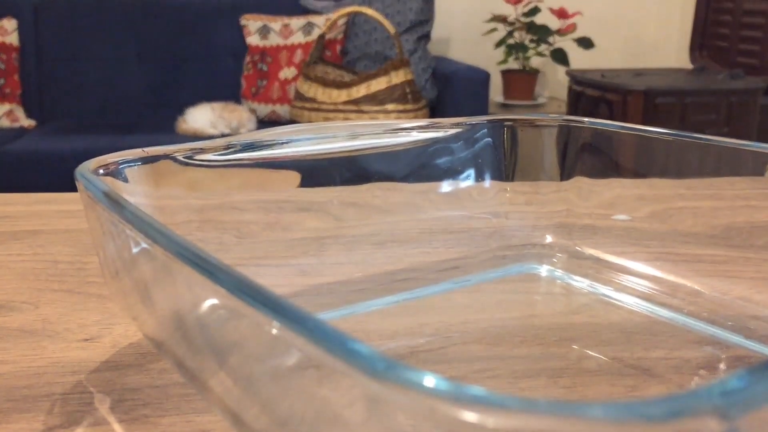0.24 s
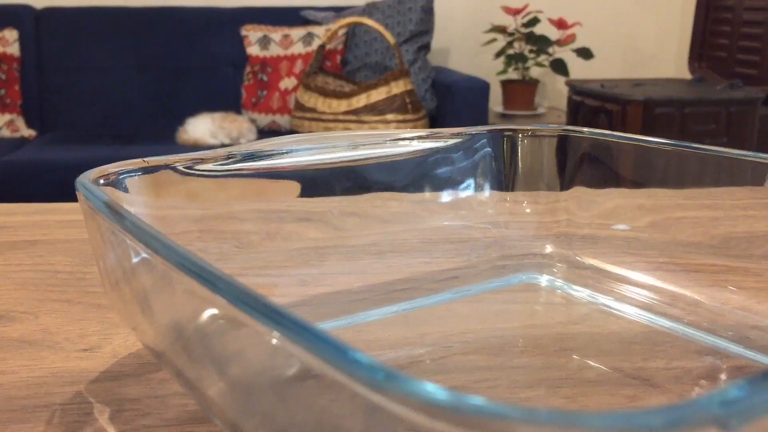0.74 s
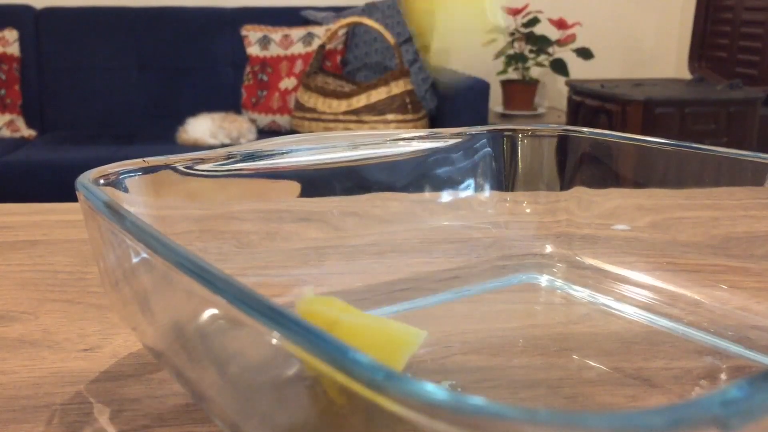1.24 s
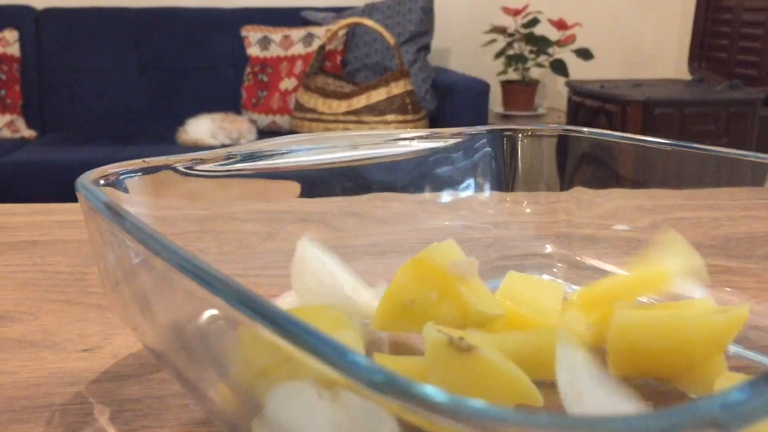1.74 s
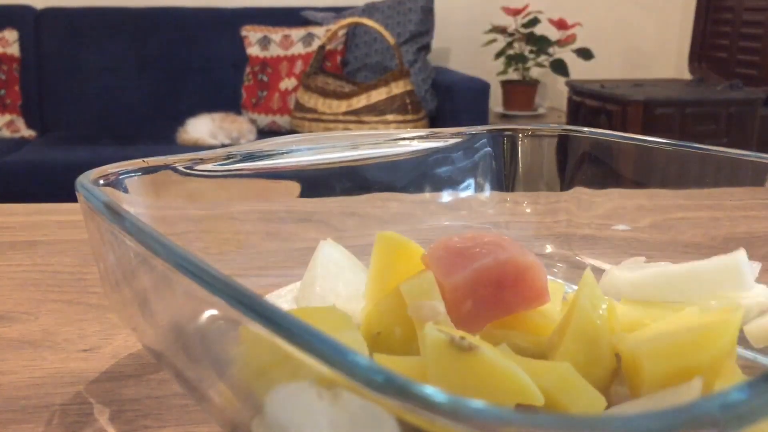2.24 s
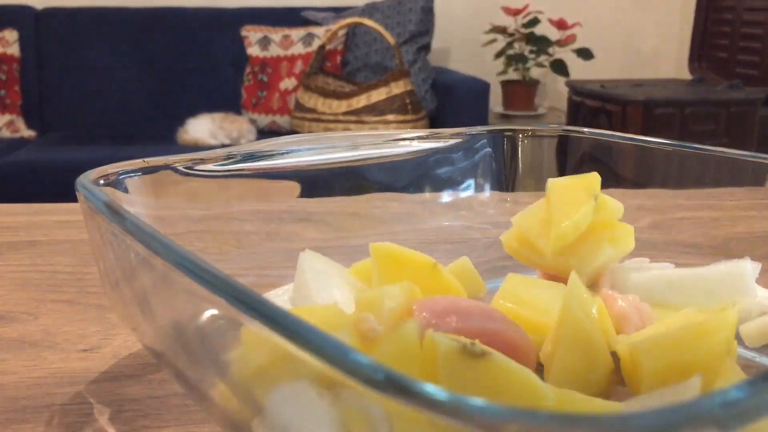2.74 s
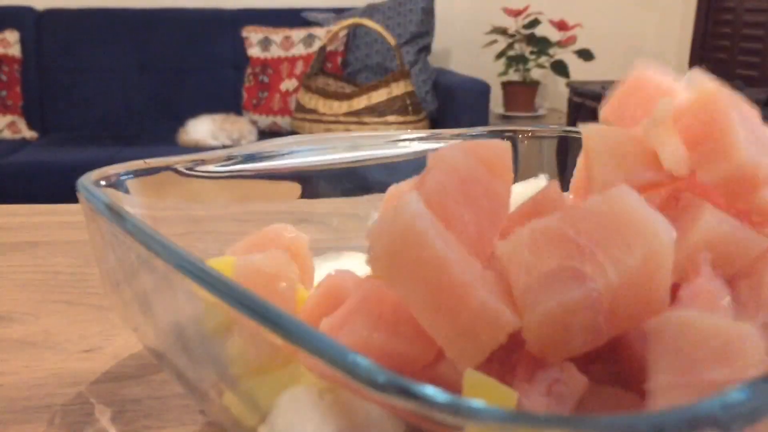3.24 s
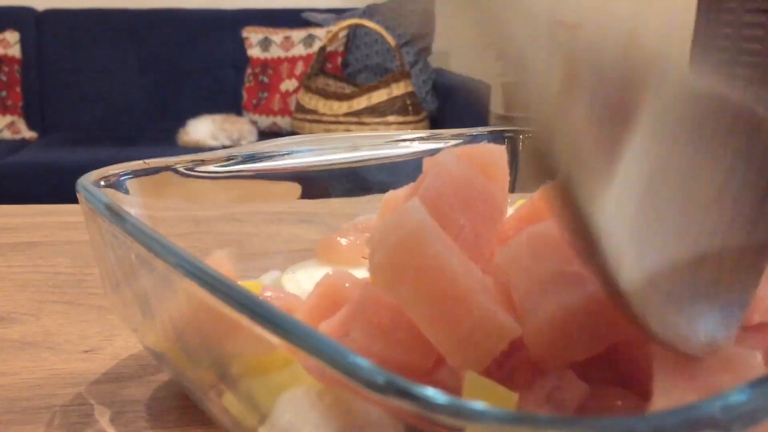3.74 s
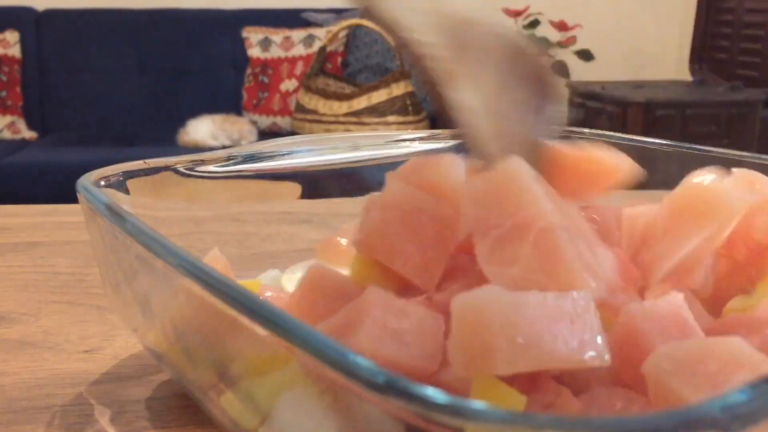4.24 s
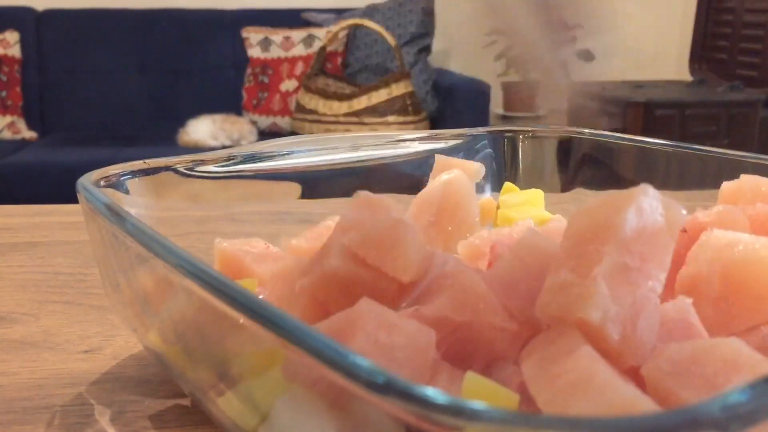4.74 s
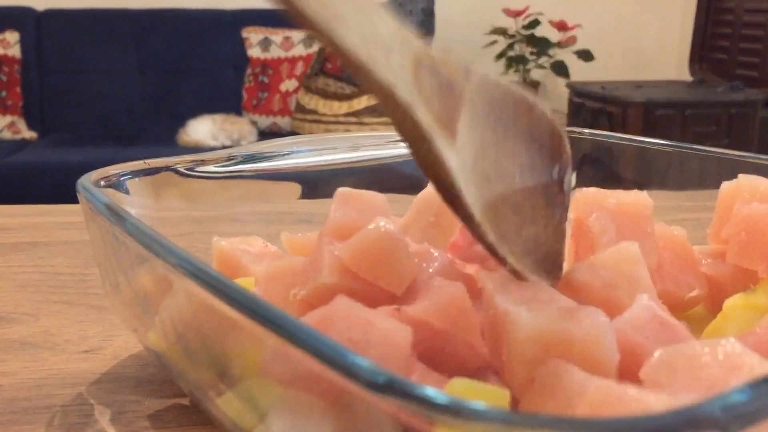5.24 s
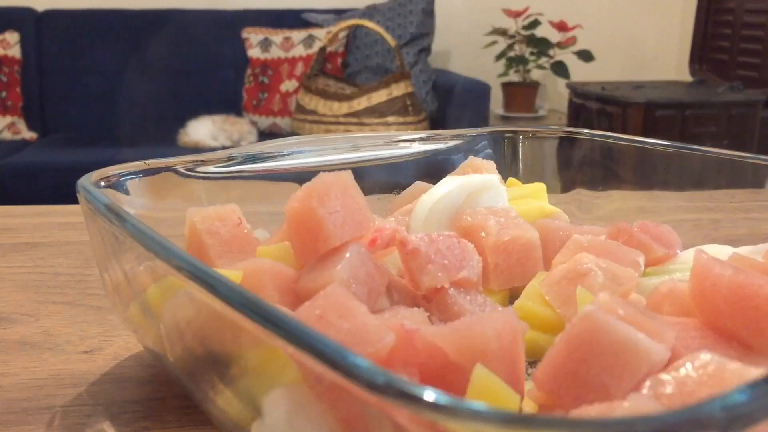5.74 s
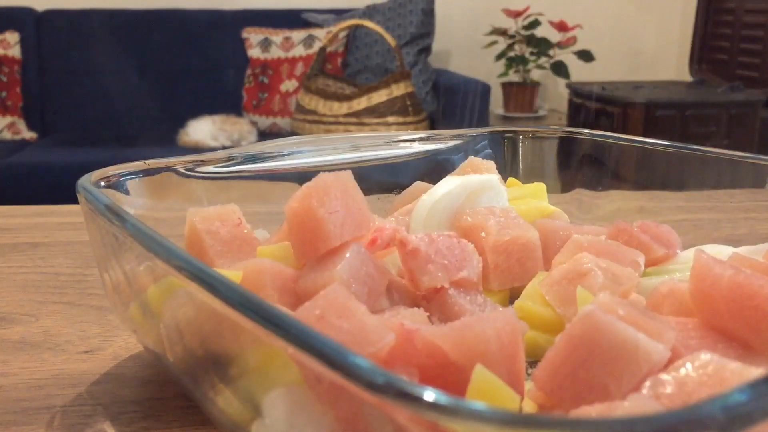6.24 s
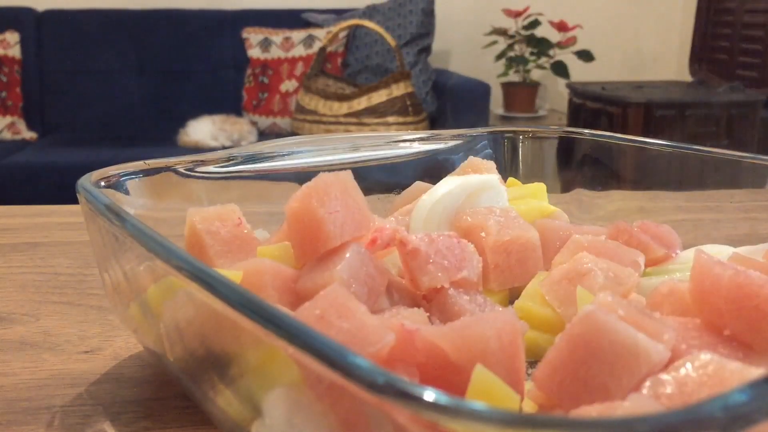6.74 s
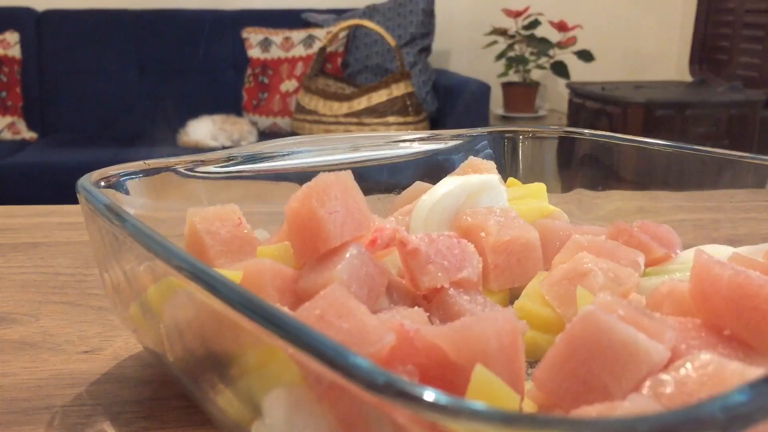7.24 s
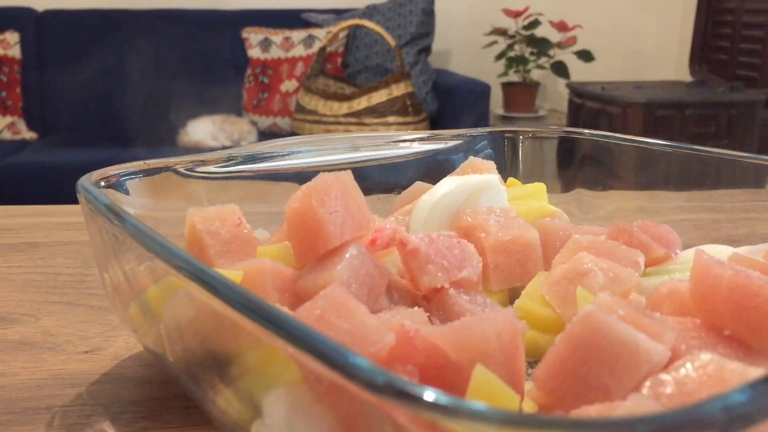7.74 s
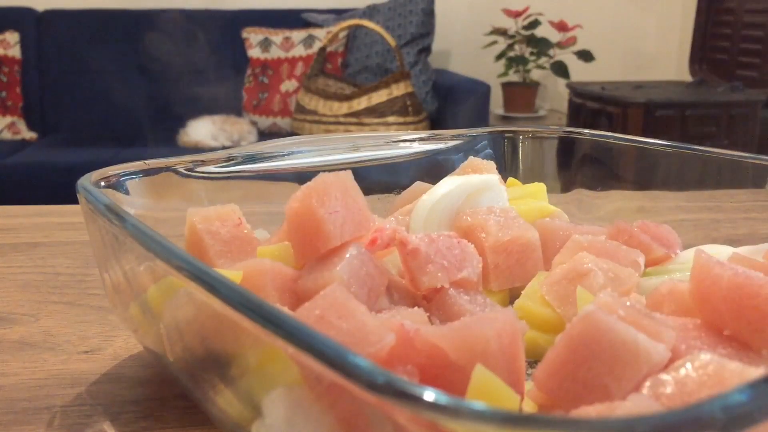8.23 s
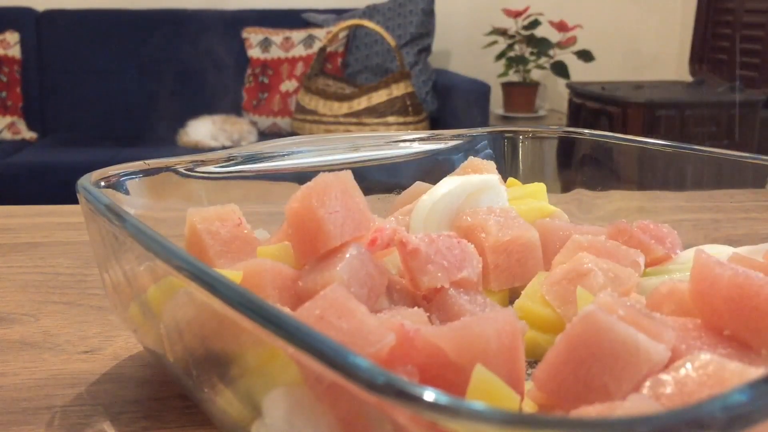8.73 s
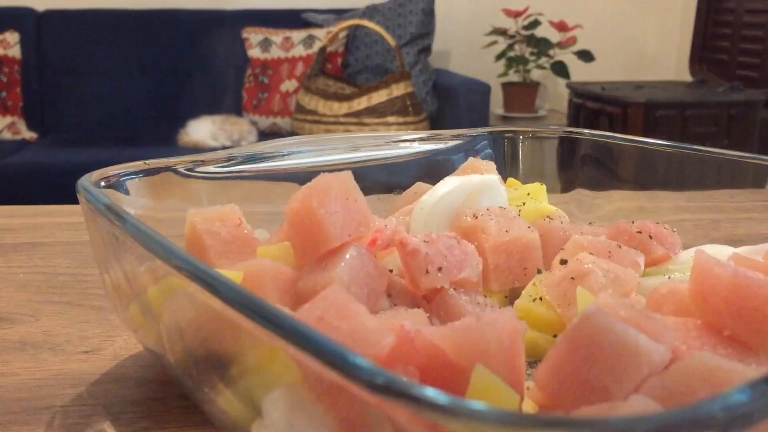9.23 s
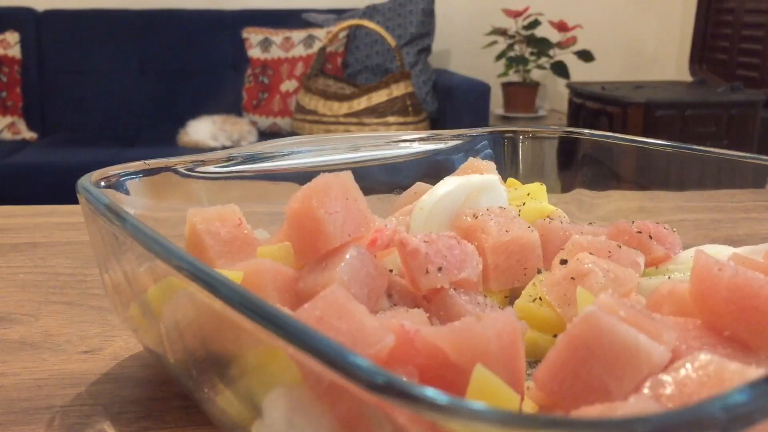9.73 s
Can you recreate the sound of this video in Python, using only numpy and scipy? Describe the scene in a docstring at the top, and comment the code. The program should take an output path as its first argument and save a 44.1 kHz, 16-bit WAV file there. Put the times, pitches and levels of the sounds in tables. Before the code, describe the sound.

In a small quiet living room with a faint low hum, firm potato and onion pieces thud and clink into a glass dish on a wooden table. A heavy wet load of raw meat slaps down, a spoon squelches through it, seasoning rattles once, then a salt mill crunches nine times and a squeaky pepper mill three times. Close, small microphone with little deep bass.

```python
"""In a small living room with a low hum, diced potato, onion and raw chicken tumble into a glass dish on a
wooden table; a wooden spoon spreads them. A dash of seasoning, nine twists of a salt mill and three of a
squeaky pepper mill follow. Impacts excite damped modes of table and glass, moist faces fizz with bursting films,
and the jar and mills filter showers of breaking grains. Decaying noise gives the answer of the walls."""
import sys
import numpy as np
from scipy import signal
from scipy.fft import rfft, irfft, next_fast_len
from scipy.io import wavfile
from scipy.ndimage import map_coordinates

SR = 44100
rng = np.random.default_rng(int(sys.argv[2]) if len(sys.argv) > 2 else 0)


def dump(signal):
    """Clip the signal to [-1, 1] and save it as 16-bit WAV at the path in sys.argv[1]."""
    limited = np.clip(np.atleast_2d(signal).T, -1, 1)
    pcm = np.round(limited * 32767).astype(np.int16)
    wavfile.write(sys.argv[1], SR, pcm)


N = 440118
TIME = np.arange(N) / SR

# Colour of a slap on the dish. Each row: frequency in Hz, relative level in dB.
SLAP_COLOUR = [(300, -12.5), (480, 7.5), (660, -0.5), (850, -5.5), (1150, -3.5), (1600, -19.5), (2100, -10),
               (3200, -31.5), (6000, -32), (16000, -38)]
# Colour of bursting wet films. Each row: frequency in Hz, relative level in dB.
WET_COLOUR = [(600, -1), (1500, -7.5), (2200, -1), (3300, 1), (4500, -7), (7000, -12.5), (11000, -6.5),
              (16000, -11.5)]
# Names of the places where the dish can be struck, in the order of the mode levels.
STRIKE_SPOTS = ("floor", "corner", "wall")
# Twists of the salt mill. Each row: start in seconds, hold in seconds, relative level in dB, relative level of
# the settling grains in dB, air resonance in Hz, resonance of the hollow hand in Hz, its relative gain in dB.
SALT_TWISTS = [(6.125, 0.072, -38, -59.5, 1360, 1610, 5), (6.514, 0.071, -36.5, -57, 950, 653, 6.5),
               (6.843, 0.066, -33.5, -52.5, 1270, 920, 5.5), (7.183, 0.072, -35.5, -50.5, 1680, 900, 5),
               (7.505, 0.067, -37, -49, 1340, 686, 1.5), (7.813, 0.056, -34.5, -49.5, 1350, 680, 4.5),
               (8.162, 0.066, -35, -50.5, 1310, 850, 10.5), (8.496, 0.059, -39.5, -57, 1210, 1040, 10.5),
               (8.785, 0.071, -37, -56.5, 1060, 1190, 6)]
# Twists of the pepper mill. Each row: start in seconds, hold in seconds, relative level in dB,
# relative level of the shaft squeal in dB.
PEPPER_TWISTS = [(9.348, 0.067, -31, -39.5), (9.64, 0.065, -36, -40), (9.933, 0.047, -35, -39.5)]
# The mill's head taking up its play before a twist. Each row: time in seconds, relative peak in dB.
HEAD_CATCHES = [(7.165, -31), (7.455, -14.5), (7.7725, -25.5), (8.4387, -35), (8.4755, -21.5),
                (8.775, -29.5), (9.642, -23)]
# Statistics of coarse grains: fractures a second per fragment size, spread of strength in dB, clumping in dB.
COARSE_GRAINS = dict(rate=220, spread_db=4.5, clump_db=8)


def amp(db):
    """Amplitude ratio of a level in decibels."""
    return 10 ** (np.asarray(db) / 20)


def unit(x, size=None):
    """Normalise x to rms 1 over its first size samples."""
    return x / np.sqrt(np.mean(x[:size] ** 2) + 1e-20)


def along(points, hz):
    """Interpolate (Hz, value) points on a logarithmic frequency axis."""
    f, v = np.transpose(points)
    return np.interp(np.log(hz + 1), np.log(f + 1), v)


def fade(t, t60):
    """Exponential decay by 60 dB in t60 seconds, from t = 0."""
    return np.exp(-np.log(1000) * np.maximum(t, 0) / t60)


def swell(t, rise, hold, t60):
    """Linear attack from t = 0, then exponential release once the hold has passed."""
    return np.clip(t / rise, 0, 1) * fade(t - hold, t60)


def wobble(rate):
    """Slow random modulation: a smooth curve through rate random knots a second."""
    return map_coordinates(rng.standard_normal(200), [TIME * rate], mode="wrap")


def add(track, s, x):
    """Superpose x on the track from time s."""
    part = track[round(s * SR):][:len(x)]
    part += x[:len(part)]


def body(spectrum, peaks=()):
    """Minimum-phase impulse response of a colour with (Hz, width Hz, dB) resonances, by the folded cepstrum."""
    size = 2048
    hz = np.fft.rfftfreq(size, 1 / SR)
    db = along(spectrum, hz)
    for f, width, gain in peaks:
        db = db + gain / (1 + (2 * (hz - f) / width) ** 2)
    cepstrum = irfft(np.log(amp(db)))
    cepstrum[1:size // 2] *= 2
    cepstrum[size // 2 + 1:] = 0
    response = irfft(np.exp(rfft(cepstrum)))[:size // 2]
    return response / np.linalg.norm(response)


def through(x, response):
    """Linear filtering: x convolved with the response of a body."""
    return signal.fftconvolve(x, response)[:len(x)]


def noise(gain):
    """Noise of rms 1, shaped by a gain function of frequency."""
    m = next_fast_len(N)
    spectrum = rfft(rng.standard_normal(m)) * gain(np.fft.rfftfreq(m, 1 / SR))
    return unit(irfft(spectrum, m)[:N])


def band(centre_hz, octaves):
    """Band noise, bell-shaped on a logarithmic frequency axis."""
    return noise(lambda hz: np.exp(-.5 * (np.log2((hz + 1) / centre_hz) / octaves) ** 2))


def grains(size, rate, spread_db):
    """Random impulse train: tiny fractures of uneven strength, on average rate a second."""
    strength = amp(spread_db * np.minimum(rng.standard_normal(size), 2))
    return (rng.random(size) < rate / SR) * rng.choice([-1, 1], size) * strength


def ring(modes, t, scatter_db):
    """Modal synthesis: a sum of damped (Hz, dB, t60 s) sines with random signs and scattered strengths."""
    hz, db, t60 = np.transpose(modes)[:, :, None]
    strength = amp(db + scatter_db * rng.standard_normal(db.shape)) * rng.choice([-1, 1], db.shape)
    return (strength * np.sin(2 * np.pi * hz * t) * fade(t, t60)).sum(0)


def snaps(events, response, t60, gain_db, break_db=0):
    """Brittle fracture: each break is a brief decaying burst of splinters filtered by a body."""
    out, t = np.zeros(N), np.arange(SR // 10) / SR
    for s, db in events:
        splinters = grains(len(t), rate=9000, spread_db=4.0) * fade(t, t60)
        snap = through(splinters * (1 + amp(break_db) * fade(t, 0.0022)), response)
        add(out, s, amp(db + gain_db) * snap / np.abs(snap).max())
    return out


def pips(events, width, t60, gain_db, skirt_db=-26):
    """Single resonance: brief sounds, each with its own pitch (width is a share of that pitch)."""
    out = np.zeros(N)
    for s, db, hz in events:
        skirt = [(hz / 4, skirt_db), (hz, skirt_db / 2), (hz * 4, skirt_db)]
        out += snaps([(s, db)], body(skirt, [(hz, hz * width, 14)]), t60, gain_db)
    return out


def food(slide_db=-4, sag_s=0.023):
    """Impact and friction: pieces land, loads sag onto the dish, the spoon stirs and the moist pile shifts."""
    # Pieces landing in the dish. Each row: time in seconds, thump in Hz, then relative levels in dB
    # of the thump, the slap and the wet crackle.
    piece_landings = [(0.792, 223, -55, -80, -83), (0.99, 152, -27, -64, -81),
                      (1.015, 188, -33.5, -44.5, -80), (1.049, 240, -28.5, -43.5, -60),
                      (1.138, 212, -33.5, -48, -80), (1.213, 275, -39.5, -52, -83),
                      (1.268, 254, -39, -56, -62), (1.449, 167, -27, -37.5, -60),
                      (1.481, 158, -66, -70, -47.5), (1.516, 193, -59.5, -60, -41),
                      (1.539, 235, -22.5, -26, -40), (1.566, 211, -26.5, -55, -64),
                      (1.588, 203, -27, -34, -65), (1.619, 274, -24, -40, -46),
                      (1.652, 242, -37, -42.5, -37.5), (1.718, 312, -29, -40, -55),
                      (1.757, 250, -63, -52, -48), (1.798, 190, -34, -42, -54),
                      (1.86, 268, -36.5, -39, -50), (1.945, 213, -41, -48.5, -53),
                      (1.975, 137, -41.5, -57, -39.5), (2.01, 176, -37.5, -44.5, -44),
                      (2.052, 233, -33.5, -40, -43), (2.09, 114, -36.5, -64, -64),
                      (2.169, 290, -36.5, -55.5, -104), (2.24, 242, -38, -61, -93),
                      (2.287, 257, -32.5, -56, -56.5), (2.556, 158, -45, -86, -61),
                      (2.601, 108, -43.5, -64, -53.5), (2.642, 260, -44.5, -56, -78),
                      (2.689, 269, -43, -60, -53.5), (2.777, 194, -38.5, -65, -48),
                      (2.953, 240, -38.5, -42, -61), (2.96, 230, -32.5, -45, -42),
                      (3.099, 202, -41, -38, -53), (3.106, 260, -24, -24.5, -44),
                      (3.124, 137, -31.5, -39, -33.5), (3.158, 171, -36, -35, -67),
                      (3.183, 198, -38, -42.5, -51), (3.436, 125, -42, -71, -57)]
    # The spoon pushing into the meat and tapping the dish. Each row: time in seconds, thump in Hz,
    # then relative levels in dB of the thump, the tap and the squelch.
    spoon_pushes = [(4.013, 91, -45, -64, -73), (4.227, 214, -34, -39, -59), (4.269, 68.4, -38.5, -74, -60),
                    (4.626, 120, -57, -59, -73), (4.735, 380, -48, -46, -70),
                    (4.979, 194, -33.5, -42.5, -46), (5.01, 65, -36, -60, -53.5)]
    # Whole loads that sag onto the dish. Each row: time in seconds, relative level in dB.
    sagging_loads = [(1.546, -42.5), (3.116, -21.5)]
    # Dish and table under the weight. Each row: frequency in Hz, relative level in dB, t60 in seconds.
    sag_modes = [(63.2, 1.5, 0.34), (139, 0, 0.19), (487, -7, 0.25), (637, -11, 0.061), (850, 7, 0.055)]
    # The pile shifting after a load or push. Each row: start in seconds, hold in seconds, relative level in dB.
    pile_slides = [(1.443, 0.42, -63), (2.595, 0.4, -65.5), (2.886, 0.04, -54), (3.121, 0.22, -60),
                   (4.297, 0.048, -51), (4.424, 0.14, -65), (4.98, 0.088, -65)]
    landing = contacts(piece_landings, thump_db=1, slap_db=-2.5, wet_db=-6.0,
                       slap_t60=0.13, squash=0.0018, wet_hz=4050)
    stirring = contacts(spoon_pushes, thump_db=-11.0, slap_db=-7.0, wet_db=1.0,
                        slap_t60=0.014, squash=0.022, wet_hz=4770)
    thumps, slaps = landing + stirring
    t = np.arange(SR // 2) / SR
    for s, db in sagging_loads:
        add(thumps, s, amp(db) * np.minimum(t / sag_s, 1) * ring(sag_modes, t, scatter_db=-1.0))
    for s, length, db in pile_slides:
        shifting = unit(wet_grains(len(t), rate=1800, pitch_hz=4080, treble_db=16.5))
        add(slaps, s, amp(db + slide_db) * swell(t, 0.026, length, t60=0.2) * shifting)
    return thumps, slaps


def contacts(rows, thump_db, slap_db, wet_db, slap_t60, squash, wet_hz, cycles=0.38, table_db=-3.5,
             wet_t60=0.055, glass_db=-13, lag=0.00323):
    """Impact: each contact thumps the table through the dish, slaps the glass and crackles wetly."""
    # The dish on the table under a soft blow. Each row: frequency in Hz before detuning,
    # relative level in dB, t60 in seconds.
    table_modes = [(58.5, -19, 0.35), (166.5, -13.5, 0.23), (243, -9, 0.16), (291.3, -8.5, 0.17),
                   (360.7, -12.5, 0.083), (437, -17, 0.13), (512.7, -14.5, 0.15)]
    # Resonances of the slap. Each row: frequency in Hz, width in Hz, relative gain in dB.
    slap_resonances = [(679, 26, 4), (860, 240, 6), (1160, 100, -1)]
    # Crisp potato crackles dully, moist meat brightly. Each row: time in seconds, treble in dB.
    moisture = [(.7, -27), (1.3, -18), (1.55, -1.5), (2.1, 5.5), (2.6, 6.5), (3.3, 3), (4.0, 19),
                (5.3, 4.5)]
    detune_octaves = .04  # each landing spot shifts the table's modes a little
    thumps, slaps, t = np.zeros(N), np.zeros(N), np.arange(SR // 3) / SR
    brief = t[:SR // 9]
    contact = 1 - np.exp(-brief / squash)  # the contact spreads as the piece flattens
    for s, hz, low_db, mid_db, high_db in rows:
        u = t * hz / cycles
        push = u * np.exp(1 - u) * np.sin(2 * np.pi * hz * t)
        # a slow, soft contact hardly reaches the modes far above its own pitch
        reached = []
        for f, db, t60 in table_modes:
            mode_hz = f * 2 ** (detune_octaves * rng.standard_normal())
            reached.append((mode_hz, db - 10 * np.log10(1 + (f / hz / 2) ** 4), t60))
        thump = unit(push + amp(table_db) * ring(reached, t, scatter_db=4.0), size=882)
        add(thumps, s + lag, amp(low_db + thump_db) * thump)  # the weight arrives after the first touch

        # dry pieces slap dully; moist ones crackle for longer
        treble_db = np.interp(s, *np.transpose(moisture))
        dull_db = min(treble_db, 0)
        colour = [(f, db + dull_db * np.clip(np.log2(f / 1500) / 4, 0, 1)) for f, db in SLAP_COLOUR]
        slap = body(colour, slap_resonances)
        smack = rng.standard_normal(len(brief)) * contact * fade(brief, slap_t60)
        smack = unit(through(smack, slap), size=882)
        struck = ring(dish_modes(rng.choice(STRIKE_SPOTS), 0), brief, scatter_db=5)
        chime = unit(through(struck, slap), size=882)
        crackle = wet_grains(len(brief), rate=4000, pitch_hz=wet_hz, treble_db=treble_db)
        crackle = unit(crackle * contact * fade(brief, wet_t60 * amp(treble_db / 2)), size=882)
        add(slaps, s, amp(mid_db + slap_db) * (smack + amp(glass_db) * chime) + amp(high_db + wet_db) * crackle)
    return np.array([thumps, slaps])


def wet_grains(size, rate, pitch_hz, treble_db, clump_db=7):
    """Bubble bursts: tiny films and bubbles break in short clusters, each family at its own pitch."""
    colour = [(hz, db + treble_db * np.clip(np.log2(hz / 3500), 0, 1)) for hz, db in WET_COLOUR]
    out = np.zeros(size)
    for hz in pitch_hz * 2 ** (.5 * rng.standard_normal(5)):
        knots = rng.uniform(0.0082, 1.0, 1000)
        clusters = amp(clump_db * map_coordinates(knots, [np.arange(size) * 90 / SR], mode="wrap"))
        bursts = grains(size, rate / 5, spread_db=5.0) * clusters
        out += through(bursts, body(colour, [(hz, hz / 3, 12)]))
    return out


def squelches(gain_db=0, resonance_db=13):
    """Adhesion: moist faces peel apart in a dense fizz that swells and dies away; single films snap."""
    # Faces peeling apart. Each row: time of the loudest in seconds, time from there to 1/e in seconds,
    # relative level in dB, resonance in Hz.
    peelings = [(2.928, .02, -59, 2870), (3.93, 0.016, -56.5, 4100), (4.018, 0.012, -47.5, 3730),
                (4.03, 0.0056, -45.5, 4400), (4.272, 0.0057, -42.5, 5130), (4.375, 0.0035, -53, 5400),
                (4.715, 0.0086, -53, 3960), (4.732, 0.0084, -51.5, 4400), (5.093, 0.014, -50.5, 5240)]
    # Wet films snapping. Each row: time in seconds, relative peak in dB.
    film_breaks = [(2.7775, -55), (2.929, -34.5), (2.9625, -24.5), (4.038, -32), (4.2283, -33),
                   (4.307, -32.5), (4.319, -34), (4.325, -41), (4.354, -43), (4.626, -42), (4.753, -47),
                   (4.979, -31), (5.063, -34)]
    # Colour of a film. Each row: frequency in Hz, relative level in dB.
    film_colour = [(300, -3), (1200, -22), (1900, 2.5), (2500, -3), (3300, 1.5), (5500, -2.5), (7000, -2.5),
                   (8500, 2), (16000, 0.5)]
    out, t = np.zeros(N), TIME[:SR // 10] - 1 / 20
    for s, length, db, hz in peelings:
        film = body(film_colour, [(hz, hz / 3, resonance_db)])
        fizz = unit(through(grains(len(t), rate=1800, spread_db=2), film))
        add(out, s + t[0], amp(db + gain_db) * fizz * np.exp(-(t / length) ** 2))
    return out + snaps(film_breaks, body(film_colour), t60=0.017, gain_db=2)


def knocks(low_db=10, high_db=27):
    """Solid impact: firm pieces knock together or bounce, each with two short resonances."""
    # Each row: time in seconds, relative peak in dB, upper resonance in Hz.
    piece_knocks = [(0.724, -49, 3680), (0.794, -39.5, 3600), (1.047, -40, 3200), (1.138, -46, 3160),
                    (1.212, -49, 3200), (1.252, -42.5, 3240), (1.398, -25, 3600), (1.42, -32, 3600),
                    (1.536, -23, 3800), (1.619, -24, 3350), (2.011, -32.5, 2400)]
    out = np.zeros(N)
    for s, db, hz in piece_knocks:
        piece = body(SLAP_COLOUR, [(hz * 0.553, hz * 0.036, low_db), (hz, hz * 0.43, high_db)])
        out += snaps([(s, db)], piece, t60=0.035, gain_db=-1.5)
    return out


def tumble(count=14, start=1.4, length=1.0, first_db=-27, last_db=-39, pitch_hz=1100, octaves=0.77):
    """Random impacts: small pieces roll off the falling heap and knock together, on average ever more weakly."""
    when, softness, pitch = rng.random((count, 3)).T
    peak_db = first_db + (last_db - first_db) * when - 8 * softness
    events = zip(start + length * when, peak_db, pitch_hz * 2 ** (octaves * (4 * pitch - 2)))
    return pips(events, width=0.4, t60=0.029, gain_db=-1.5)


def resonant_pops():
    """Single resonance: short pops of moist pieces and of the loaded dish."""
    # Each row: time in seconds, relative peak in dB, pitch in Hz.
    short_pops = [(1.541, -16.5, 860), (2.66, -50, 2730), (2.863, -45, 2470), (2.944, -38.5, 766),
                  (2.99, -33.5, 2880), (3.022, -38.5, 2700), (3.108, -14.5, 877), (3.436, -41.5, 2770)]
    return pips(short_pops, width=0.26, t60=0.019, gain_db=0.5)


def glass(crack_db=-3, scatter_db=2, wash_db=-18, wash_t60=0.14):
    """Modal excitation: hard contacts ring the dish; the spot weights the modes, a steep tilt favours low ones."""
    # Each row: time in seconds, relative level in dB, tilt in dB per octave, spot struck.
    hard_contacts = [(0.988, -45.5, -8.5, "floor"), (1.046, -49.5, -7.5, "corner"),
                     (1.137, -57, -10.5, "corner"), (1.563, -37, -10, "wall"), (1.584, -37.5, -8, "floor"),
                     (1.656, -30, -4, "wall"), (1.824, -34, -4.5, "corner"), (1.848, -44, -5, "floor"),
                     (1.894, -41.5, -3.5, "corner"), (2.048, -41, -8, "wall"),
                     (2.286, -49.5, -12, "corner"), (2.601, -56.5, -5, "corner"),
                     (2.736, -54.5, -10, "corner"), (2.777, -48.5, -10, "corner"),
                     (2.961, -50.5, -2, "wall"), (3.123, -40, -6.5, "wall"), (3.21, -33, -14.5, "wall")]
    out, t = np.zeros(N), np.arange(SR // 5) / SR
    for s, db, tilt, spot in hard_contacts:
        chime = ring(dish_modes(spot, tilt), t, scatter_db)
        # a crack, then a wash of dense weak modes
        envelope = fade(t, 0.013) + amp(wash_db) * fade(t, wash_t60)
        crack = through(rng.standard_normal(len(t)) * envelope, body(WET_COLOUR))
        crack_gain = amp(crack_db + 2.9 * tilt)
        add(out, s, amp(db) * (unit(chime, size=882) + crack_gain * unit(crack, size=882)))
    return out


def dish_modes(spot, tilt_db):
    """Mode participation: the glass modes as a blow on one spot reaches them, as (Hz, dB, t60 s)."""
    # Each row: frequency in Hz, t60 in seconds, then relative levels in dB struck on the floor,
    # in a corner and on the wall.
    glass_modes = [(1060, 0.13, -3, 1.5, -3), (1157, 0.068, 3.5, 3.5, 1), (1392, 0.14, -8, -4, -3.5),
                   (1986, 0.14, -2, -6.5, -1.5), (2398, 0.12, 3, -14, 0), (2500, 0.32, -14, -9, -19),
                   (3120, 0.066, -8, 3, 13), (3310, 0.053, 1, 12, -12.5), (4187, 0.047, -7, 8, 8),
                   (4350, 0.19, -2, -11, -6), (5430, 0.087, -15, -8, 6), (5580, 0.18, -6.5, -22, -5),
                   (6230, 0.093, -17, -19, 1), (7940, .12, -24, -15, -11), (8960, 0.11, -4, -16, -11)]
    column, lowest_hz = STRIKE_SPOTS.index(spot), glass_modes[0][0]
    return [(hz, levels[column] + tilt_db * np.log2(hz / lowest_hz), t60) for hz, t60, *levels in glass_modes]


def crunch(strokes, spectrum, peaks, rate, spread_db, clump_db, gain_db, lead_db=-23, lead=0.02):
    """Granular fracture: each stroke swells in softly and breaks a clumpy shower of grains inside a body."""
    out, t = np.zeros(N), np.arange(SR // 3) / SR - lead

    def unevenness():
        """Smooth random modulation of the force, 200 knots a second."""
        return map_coordinates(rng.uniform(-1, 1, 200), [(t + lead) * 200], mode="wrap")

    for s, length, db, rise, t60 in strokes:
        force = swell(t, rise, length, t60) * amp(clump_db / 2 * unevenness())
        force = force + amp(lead_db) * np.exp(-(t / lead) ** 2)
        shower = np.zeros(len(t))
        # fragments of each size come in their own clumps, crumble in their own way and ring at their own pitch
        for hz in 2600 * 2 ** (0.9 * rng.standard_normal(size=8)):
            crumble = rng.standard_normal(size=200) * fade(TIME[:200], t60=.006)
            fragment = unit(through(body(spectrum, peaks + [(hz, hz / 6, 6)]), crumble))
            breaks = grains(len(t), rate, spread_db) * amp(clump_db * unevenness()) * force
            shower += through(breaks, fragment)
        add(out, s - lead, amp(db + gain_db) * unit(shower, size=round((length + lead) * SR)))
    return out


def seasoning_jar():
    """Granular impact: a dash of seasoning is shaken in a jar whose resonances colour it."""
    # Bursts of grains. Each row: start, hold in seconds, relative level in dB, rise and fade t60 in seconds.
    dashes = [(5.335, 0.054, -42, 0.058, 0.059), (5.374, 0.011, -33, 0.0014, 0.32)]
    # Coarse grains rattling. Each row: time in seconds, relative peak in dB.
    rattles = [(5.357, -36), (5.375, -23), (5.394, -25), (5.412, -27.5)]
    # Colour of the jar. Each row: frequency in Hz, relative level in dB.
    jar_colour = [(100, -17), (300, -7), (480, -16.5), (900, -10), (2000, -8.5), (3500, -4), (5000, -8.5),
                  (7000, -6.5), (10000, -10), (16000, -13.5)]
    # Its resonances. Each row: frequency in Hz, width in Hz, relative gain in dB.
    jar_resonances = [(1840, 300, 7.9), (2610, 430, 3), (3600, 370, 8.9)]
    out = crunch(dashes, jar_colour, jar_resonances, gain_db=-8.0, **COARSE_GRAINS)
    return out + snaps(rattles, body(jar_colour, jar_resonances), t60=0.041, gain_db=3)


def salt_mill(air_width_hz=170, air_db=7, hollow_width_hz=220):
    """Cavity filtering: salt breaks between burrs; the mill's air and the hollow hand colour each twist."""
    # Single hard grains bursting between the burrs. Each row: time in seconds, relative peak in dB.
    salt_cracks = [(6.128, -23.5), (6.189, -26), (6.523, -18.5), (6.532, -25), (6.545, -21), (6.561, -29),
                   (6.609, -29.5), (6.835, -26), (6.843, -26), (6.872, -23.5), (6.921, -27), (7.189, -17.5),
                   (7.248, -28), (7.536, -27.5), (7.556, -21.5), (7.822, -36), (7.832, -27), (8.1605, -26),
                   (8.178, -28), (8.2035, -21), (8.2374, -17), (8.481, -31), (8.5, -17.5), (8.512, -22),
                   (8.816, -22), (8.847, -22), (8.862, -23)]
    # Colour of the mill. Each row: frequency in Hz, relative level in dB.
    mill_colour = [(100, -25), (230, 1), (480, -5), (680, -1.5), (1100, -0.5), (1650, 1), (3200, -1),
                   (4000, -0.5), (4900, -6.5), (5700, -2.5), (7200, -1), (7600, -6), (9300, -2.5),
                   (11500, -7.5), (16000, -6)]
    # Its fixed resonances. Each row: frequency in Hz, width in Hz, relative gain in dB.
    mill_resonances = [(2108, 480, 15.55), (2770, 110, 8), (6360, 760, 4.6)]
    out = settling()
    starts = np.array([row[0] for row in SALT_TWISTS])
    for s, length, db, _, hz, hollow_hz, hollow_db in SALT_TWISTS:
        peaks = mill_resonances + [(hz, air_width_hz, air_db), (hollow_hz, hollow_width_hz, hollow_db)]
        # each crack takes the colour of the nearest twist
        cracks = [crack for crack in salt_cracks if starts[np.abs(starts - crack[0]).argmin()] == s]
        stroke = (s, length, db, 0.0042, 0.14)  # rise and fade t60 in seconds
        out += crunch([stroke], mill_colour, peaks, gain_db=-2.0, **COARSE_GRAINS)
        out += snaps(cracks, body(mill_colour, peaks), t60=0.022, gain_db=1.5)
    return out


def settling(gain_db=1.5, t60=0.29, air_db=14, upper_db=9):
    """Cavity excitation: loose grains patter through the mill after each twist and excite the air in it."""
    out, t = np.zeros(N), np.arange(SR // 3) / SR
    colour = [(300, -25), (1200, 0.5), (4000, -4.5), (8000, -14), (16000, -37)]
    for s, length, _, db, hz, *_ in SALT_TWISTS:
        hollow = body(colour, [(hz, hz / 4, air_db), (3600, 900, upper_db)])
        patter = through(grains(len(t), rate=1500, spread_db=4), hollow)
        add(out, s + length, amp(db + gain_db) * unit(patter) * swell(t, 0.017, 0.042, t60))
    return out


def pepper_mill():
    """Granular fracture: peppercorns break between the burrs, or roll there without breaking."""
    # Single hard grains bursting between the burrs. Each row: time in seconds, relative peak in dB.
    pepper_cracks = [(9.363, -25), (9.389, -15), (9.394, -15.5), (9.65, -14.5), (9.671, -16.5),
                     (9.949, -17)]
    # Colour of the mill. Each row: frequency in Hz, relative level in dB.
    mill_colour = [(120, -23), (280, 1.5), (420, -5.5), (750, 1.5), (1130, -6), (1500, 2.5), (2500, -3.5),
                   (3800, -9.5), (5000, -18.5), (7000, -17.5), (10000, -10.5), (16000, -21)]
    # Its resonances. Each row: frequency in Hz, width in Hz, relative gain in dB.
    mill_resonances = [(1790, 130, 7.9), (2230, 440, 5.1), (5800, 100, 19.7)]
    # Peppercorns rolling. Each row: start, hold in seconds, relative level in dB, rise and fade t60 in seconds.
    corn_rolls = [(9.274, 0.026, -47.5, 0.0028, 0.35), (9.47, 0.0376, -59, 0.017, 0.11)]
    # Colour of the rolling. Each row: frequency in Hz, relative level in dB.
    roll_colour = [(120, -22), (300, 6), (650, 6), (1100, -5), (1900, -1), (2600, -19), (4200, -16),
                   (6000, -25), (16000, -27)]
    strokes = [(s, length, db, 0.0064, 0.19) for s, length, db, _ in PEPPER_TWISTS]  # rise, fade t60 in s
    out = crunch(strokes, mill_colour, mill_resonances, gain_db=-5.0, **COARSE_GRAINS)
    out += snaps(pepper_cracks, body(mill_colour, mill_resonances), t60=0.043, gain_db=-6.0)
    return out + crunch(corn_rolls, roll_colour, [], gain_db=-4.5, **COARSE_GRAINS)


def pepper_shaft(gain_db=-9.0, soft_db=-10, count=5, wander_hz=130):
    """Stick-slip friction: the shaft slips at varying pitches; only hard slips ring its upper mode fully."""
    # Low and high mode of the shaft. Each row: frequency in Hz before wandering, relative level in dB,
    # t60 in seconds.
    shaft_modes = [(6200, 2, 0.03), (14900, 1.5, 0.023)]
    # Hard slips near the end of a twist. Each row: time in seconds, relative peak in dB.
    hard_slips = [(9.421, -31), (9.45, -42), (9.462, -52), (9.483, -45), (9.743, -41), (9.763, -28.5)]
    lead_s, rise_s, hold_s, fade_s = 0.031, 0.049, 0.14, 0.12  # the shaft turns before and after the crush
    out, t = np.zeros(N), TIME[:SR // 3]

    def squeak(shift_hz, upper_db):
        """Modal ring of one slip."""
        low, high = (ring([(hz + shift_hz, db, t60)], t[:SR // 15], scatter_db=0) for hz, db, t60 in shaft_modes)
        return low + amp(upper_db) * high

    for s, _, _, db in PEPPER_TWISTS:
        slipping = np.zeros(len(t))
        for shift in wander_hz * np.linspace(-1, 1, count):
            slipping += through(grains(len(t), rate=30, spread_db=5.0), squeak(shift, soft_db))
        add(out, s - lead_s, amp(db + gain_db) * unit(slipping) * swell(t, rise_s, hold_s, fade_s))
    for slip in hard_slips:
        out += snaps([slip], squeak(wander_hz * rng.uniform(-0.9, 1), 0), t60=0.012, gain_db=0.5)
    return out


def head_catch():
    """Backlash: the mill's head takes up its play and knocks with its own resonances."""
    # Colour of the catch. Each row: frequency in Hz, relative level in dB.
    catch_colour = [(200, -19), (700, -11), (1800, -15.5), (3000, -14.5), (5300, -24), (8500, -8),
                    (11000, -26), (16000, -17.5)]
    # Its resonances. Each row: frequency in Hz, width in Hz, relative gain in dB.
    catch_resonances = [(2790, 410, 20), (4200, 620, 9), (6190, 720, 19.7)]
    return snaps(HEAD_CATCHES, body(catch_colour, catch_resonances), t60=0.028, gain_db=-5.5)


def head_scrape(below_db=-29, t60=0.29):
    """Dry friction: after each catch the head scrapes grittily, the louder the harder it caught."""
    out, t = np.zeros(N), TIME[:SR // 4]
    bites = np.array([row[0] for row in SALT_TWISTS + PEPPER_TWISTS])
    head = body([(300, -19), (2000, 1), (8000, -2), (16000, -13)], [(4400, 460, 13), (6740, 1100, 14)])
    for s, db in HEAD_CATCHES:
        grit = unit(through(grains(len(t), rate=2500, spread_db=4), head))
        hold = np.abs(bites - s).min()  # as long as the gap to the nearest twist
        add(out, s, amp(db + below_db) * grit * swell(t, 0.0093, hold, t60))
    return out


def mills():
    """Superposition of the seasoning jar, the salt mill and the pepper mill with its squeaking shaft."""
    return seasoning_jar() + salt_mill() + pepper_mill() + head_catch() + head_scrape() + pepper_shaft()


def handling():
    """Band noise under bell-shaped envelopes: soft swishes and bumps of hands and sleeves."""
    # Each row: time of the loudest in seconds, time from there to 1/e in seconds, level in dB,
    # centre in Hz, width in octaves.
    swishes = [(3.823, 0.12, -62.5, 850, 2), (3.77, 0.054, -59.5, 280, 0.076),
               (4.497, 0.026, -50.5, 267, .45), (6.95, 0.082, -44.5, 57, 0.15),
               (9.204, 0.018, -52.5, 12400, 0.7)]
    out = np.zeros(N)
    for s, length, db, hz, octaves in swishes:
        out += amp(db) * np.exp(-((TIME - s) / length) ** 2) * band(hz, octaves)
    return out


def ticks():
    """Light impact: small ticks, taps and knocks, each a single resonance."""
    # Each row: time in seconds, relative peak in dB, pitch in Hz.
    small_ticks = [(.477, -47.5, 800), (1.398, -33, 610), (4.2283, -37, 1720), (5.817, -50.5, 920),
                   (6.36, -49, 1450), (7.974, -44, 2240)]
    return pips(small_ticks, width=0.54, t60=0.024, gain_db=-3.5, skirt_db=-50)


def air(air_db=-64.0, hum_db=-1, hum_hz=138.3, waver_db=5.5):
    """Stationary noise with a narrow hum, a tone and bands of noise, under random amplitude modulation."""
    # Colour of the room noise. Each row: frequency in Hz, relative level in dB.
    air_colour = [(20, -37), (40, -8), (70, -2), (110, -1.5), (170, -4), (260, -8.5), (400, -16.5),
                  (700, -17.5), (1100, -24.5), (2100, -22.5), (3500, -26.5), (7000, -30.5), (11000, -31.5),
                  (16000, -35)]
    # Course of the hum. Each row: time in seconds, relative level in dB.
    hum_course = [(0, -62), (.8, -60), (4.5, -72), (4.93, -57), (5.15, -66), (5.7, -60), (6, -64),
                  (6.4, -59), (6.8, -63), (7.1, -55), (7.35, -62), (7.83, -56), (8.05, -68), (8.3, -58),
                  (9.2, -57), (9.32, -68)]
    hum = np.sin(2 * np.pi * hum_hz * TIME)
    hum = hum + 0.71 * band(hum_hz, octaves=0.17) + amp(-11.0) * band(72, octaves=0.19)
    level_db = np.interp(TIME, *np.transpose(hum_course)) + hum_db + waver_db * wobble(rate=8.4)
    return amp(air_db) * noise(lambda hz: amp(along(air_colour, hz))) + amp(level_db) * hum


def room(x, build=0.00052):
    """Diffuse reverberation: decaying noise for the room, drawn afresh for each third of a second."""
    # Each row: frequency in Hz, reverberation t60 in seconds.
    room_decay = [(60, 0.43), (160, 0.63), (400, 0.81), (900, 0.51), (2000, 0.4), (4000, 0.45),
                  (8000, 0.37), (16000, 0.33)]
    out, step = np.zeros(N), SR // 3
    for start in range(0, N, step):
        hz, t, z = signal.stft(rng.standard_normal(SR * 2 // 3), SR, nperseg=256)
        decay = fade(t, along(room_decay, hz)[:, None]) * (1 - np.exp(-t / build))
        tail = signal.istft(z * decay, SR)[1]
        add(out, start / SR, signal.fftconvolve(x[start:start + step], tail / np.linalg.norm(tail)))
    return out


def scene():
    """Superposition of direct sound, reverberation and room noise; the thumps excite the room most strongly."""
    thumps, slaps = food()
    slaps = slaps + squelches() + knocks() + tumble() + resonant_pops()
    clinks = glass()
    milling = mills() + handling() + ticks()
    walls = room(amp(-7.0) * thumps + amp(-12.5) * slaps + amp(-11.5) * clinks + amp(-12.5) * milling)
    return (thumps + slaps + clinks + milling + walls + air())[None]


def record(dry, low_hz=40, notch_hz=10400, notch_width_hz=600, notch_db=-7, top_hz=15950):
    """Band limiting: deep bass is cut away below low_hz, the small microphone has a treble notch, and nothing
    passes above top_hz + 150."""
    dry = signal.sosfilt(signal.butter(2, low_hz, "high", fs=SR, output="sos"), dry)
    m = next_fast_len(N + SR // 2)
    hz = np.fft.rfftfreq(m, 1 / SR)
    notch = amp(notch_db / (1 + (2 * (hz - notch_hz) / notch_width_hz) ** 2))
    band_limit = np.clip((top_hz - hz) / 300 + .5, 0, 1)
    return irfft(rfft(dry, m) * notch * band_limit, m)[..., :N]


dry = scene()
out = record(dry)
dump(out)
```